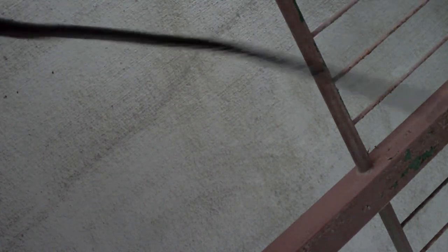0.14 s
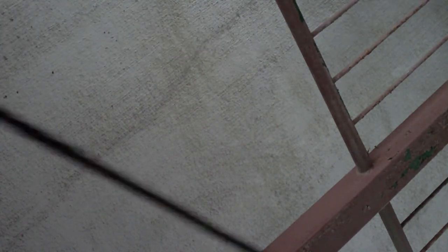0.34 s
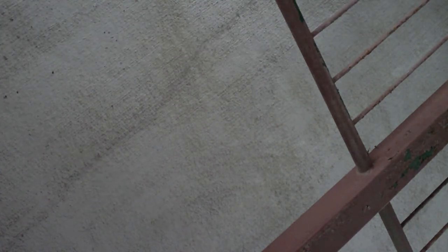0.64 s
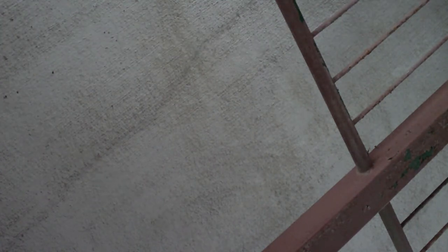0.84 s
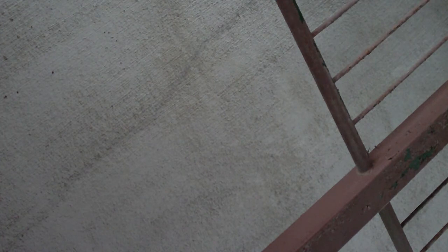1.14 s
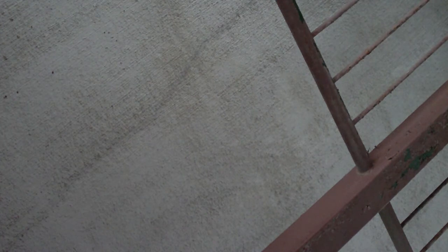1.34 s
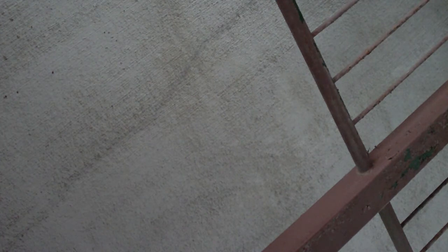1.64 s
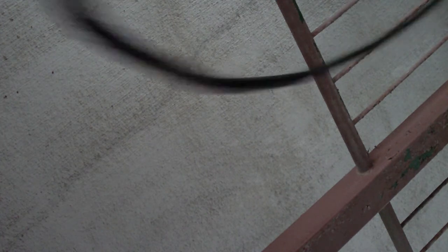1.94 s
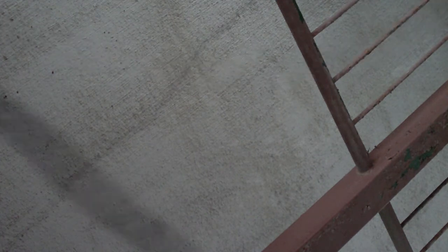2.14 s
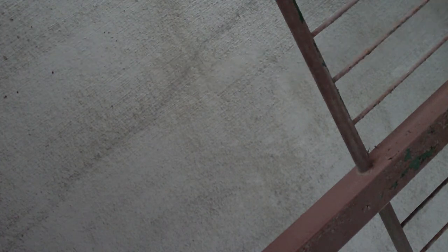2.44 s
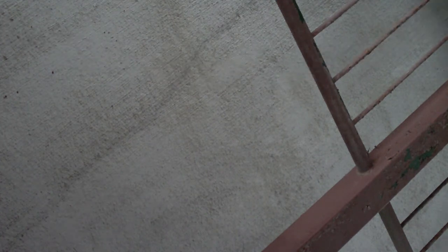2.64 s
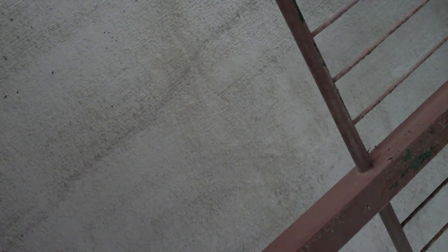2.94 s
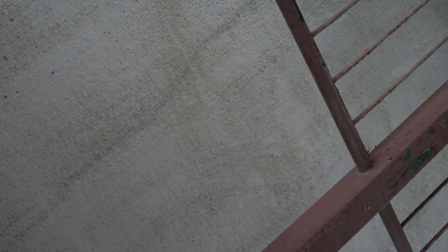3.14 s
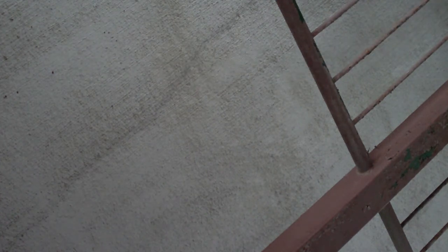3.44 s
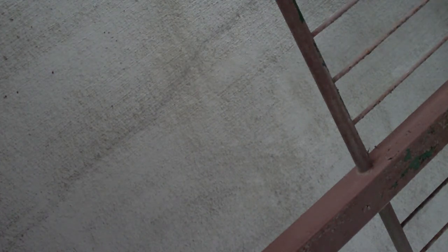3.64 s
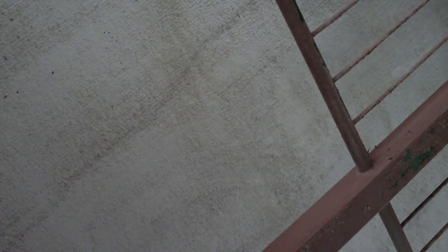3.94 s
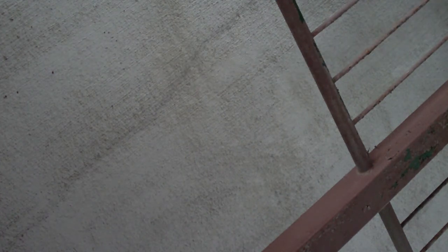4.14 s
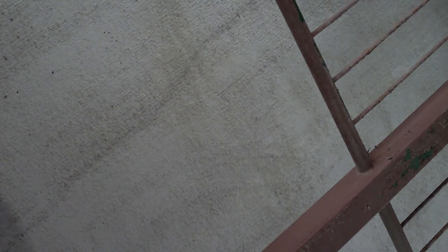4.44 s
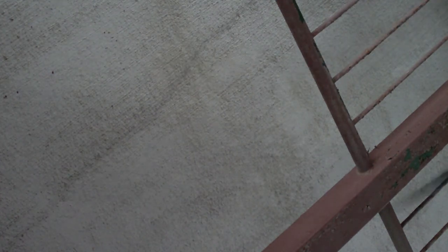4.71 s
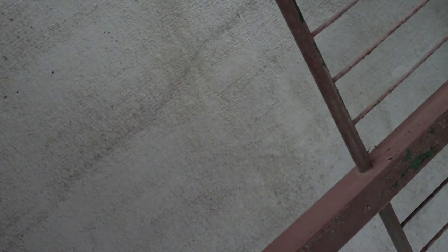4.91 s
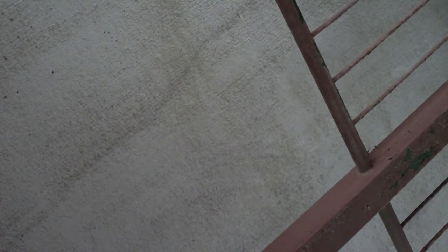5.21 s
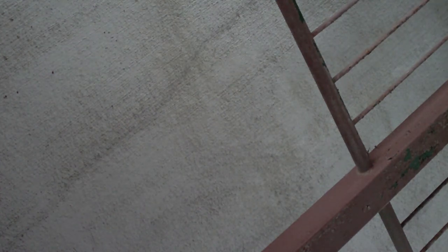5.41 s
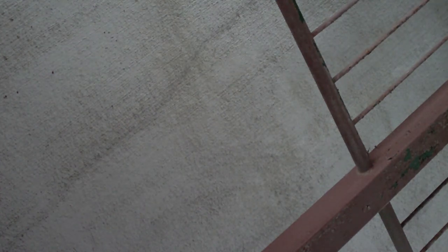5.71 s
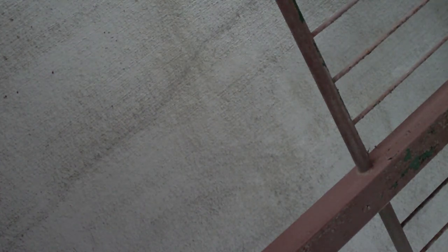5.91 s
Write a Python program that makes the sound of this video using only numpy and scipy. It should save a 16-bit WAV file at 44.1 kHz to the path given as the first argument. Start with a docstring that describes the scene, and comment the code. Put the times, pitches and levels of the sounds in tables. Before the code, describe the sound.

In a draughty, hard-walled hall with low rumble and steady soft hiss, a leather whip cracks three times at roughly two-second intervals. A very brief swish leads into each explosive, fizzy snap, and the walls throw back quick scatter and a short ring. Between cracks the lash ticks and slaps faintly on the floor. Draught bumps the microphone softly; the extreme top is dulled.

```python
"""A draughty, hard-walled hall with a low rumble and a steady hiss, where a leather bullwhip is cracked three times.
Each throw swishes and rushes as filtered noise, with faint narrow-band whistles around the later two.
At each crack the tip sheds an N-shaped shock wave, a low push and a burst of fizz; the walls throw them back.
After the cracks and between them the lash slaps and ticks on the floor, as short shaped puffs of noise.
The draught brushes the microphone in brief pressure dips; the microphone dulls the top."""
import sys
import numpy as np
from scipy import signal
from scipy.fft import rfft, irfft
from scipy.io import wavfile
from scipy.ndimage import uniform_filter1d

SR = 44100
rng = np.random.default_rng(int(sys.argv[2]) if len(sys.argv) > 2 else 0)


def wrap_up_sound(samples):
    """Save the sound to the file named by the first command line argument, as 16-bit audio."""
    columns = np.atleast_2d(samples).T
    # keep every value between -1 and 1, then stretch to whole-number steps
    tamed = np.clip(columns, -1, 1)
    steps = np.round(tamed * 32767).astype(np.int16)
    wavfile.write(sys.argv[1], SR, steps)


N = 267669  # samples

# The three cracks. Each row: time in seconds, shock peak in dB, shock length in seconds,
# shock's room level in dB relative to the shock, fizz energy in dB, fizz lead in seconds, fizz swell time
# in seconds, fizz tilt in dB per octave, fizz's room level in dB relative to the fizz, push in dB, rush in dB.
CRACKS = [(0.675, -14, 0.00071, -0.5, 0, -.0002, 0.0017, -1.1, 0, -28, -28.5),
          (2.7018, -12.5, 0.000583, -8, -0.6, .0025, 0.0021, 0.1, -3, -25.5, -32.5),
          (4.7601, -6.5, 0.000706, -3, -2.1, .0002, 0.00099, 0, -4, -21, -42)]


def gain_of(db):
    """Amplitude factor for a level in dB."""
    return 10 ** (np.asarray(db) / 20)


def evened(x):
    """The signal scaled to an RMS of 1."""
    return x / np.sqrt(np.mean(x ** 2) + 1e-20)


def bell(t, half):
    """A smooth rise and fall of height 1 around t = 0."""
    return np.exp(-.5 * (t / half) ** 2)


def read(points, hz, column=1):
    """One column of a table, joined by straight lines over log frequency."""
    columns = np.transpose(points)
    return np.interp(np.log(hz + 1), np.log(columns[0] + 1), columns[column])


def add(mix, s, sound):
    """Lay a sound into the mix from s seconds on, cut where the mix ends."""
    start = max(round(s * SR), 0)
    part = mix[start:][:len(sound)]
    part += sound[:len(part)]


def coloured(x, db_at, size=2048):
    """Causal minimum-phase filter whose gain in dB is db_at(Hz), with a floor of -80 dB."""
    hz = np.fft.rfftfreq(size, 1 / SR)
    half = np.log(gain_of(np.maximum(db_at(hz), -80)))
    log_gain = np.concatenate([half, half[-2:0:-1]])
    spectrum = np.exp(np.conj(signal.hilbert(log_gain)))  # the Hilbert transform gives the phase
    return signal.fftconvolve(x, np.fft.ifft(spectrum).real)


def burst(swell_s, db_at, size=2048):
    """A short puff of noise of energy 1 that swells and dies, with its spectrum shaped by db_at(Hz)."""
    u = np.arange(size) / SR / max(swell_s, 1 / SR)
    puff = rng.standard_normal(size) * u * np.exp(-u)
    z = rfft(puff)
    local_power = uniform_filter1d(abs(z) ** 2, size=5)
    flat = irfft(z / np.sqrt(local_power + 1e-20))[:size // 2]  # even spectrum before colouring
    puff = coloured(flat, db_at)
    return puff / np.linalg.norm(puff)


def hall(x, build_up_s=0.0034, clump_db=2.0):
    """Quick scatter and late ring of the hard walls; each call draws another tail, as for another place."""
    # Each row: frequency in Hz, early scatter in dB, its 60 dB decay time in seconds,
    # late ring in dB, its 60 dB decay time in seconds.
    decays = [(120, -10.5, 0.066, -22.5, 0.98), (338, -4.5, 0.047, -28, 0.85),
              (710, -19, 0.17, -30.5, 0.54), (1000, -18.5, 0.22, -33.5, 0.79),
              (1930, -13.5, 0.23, -29.5, 0.58), (2350, -18.5, 0.24, -28, 0.58),
              (3370, -15.5, 0.25, -27, 0.6), (4900, -19.5, 0.31, -25.5, 0.55),
              (6700, -14.5, 0.27, -31.5, 0.7), (9700, -19.5, 0.27, -26.5, 0.46),
              (15000, -21.5, 0.22, -26, 0.34)]
    clumps = evened(uniform_filter1d(rng.standard_normal(SR), size=130))  # reflections arrive in clumps
    taps = evened(rng.choice([-1., 1.], SR) * gain_of(clump_db * clumps))
    hz, t, z = signal.stft(taps, SR, nperseg=256)
    early_db = read(decays, hz, 1)[:, None] - 60 * t / read(decays, hz, 2)[:, None]
    late_db = read(decays, hz, 3)[:, None] - 60 * t / read(decays, hz, 4)[:, None]
    envelope = np.hypot(gain_of(early_db), gain_of(late_db))
    response = signal.istft(z * envelope, SR, nperseg=256)[1]
    age = np.arange(len(response)) / SR
    thickening = 1 - np.exp(-(age / build_up_s) ** 2)  # more walls answer
    return signal.fftconvolve(x, response * thickening)


def echoes(x, paths):
    """The direct sound and its slightly dulled returns from the nearest surfaces."""
    response = signal.unit_impulse(SR // 50)
    dulled = signal.lfilter([.7], [1, -.3], signal.unit_impulse(16))
    for delay_s, gain in paths:
        add(response, delay_s, gain * dulled)
    return signal.fftconvolve(x, response)


def air(level_db=-43.5, patchy_db=2.5, lumpy_below_hz=900, rumble_below_hz=200):
    """Steady hiss over a rumble that follows the draught's gusts and lulls and comes in small lumps."""
    # Background spectrum. Each row: frequency in Hz, relative density in dB per Hz.
    background = [(20, 3.5), (50, -2.5), (110, -5), (200, -9), (330, -12), (500, -17), (1000, -23.5),
                  (2000, -30.5), (4000, -37), (8000, -45), (11000, -48), (14000, -50.5)]
    # Gusts and lulls. Each row: middle in seconds, change of the rumble in dB, half length in seconds.
    gusts = [(1.155, 4.5, 0.052), (3.11, 3.5, 0.035), (3.793, -4, 0.26), (4.355, 4.5, 0.086),
             (4.598, -9, 0.022), (4.88, 4, .08)]
    hz, t, z = signal.stft(rng.standard_normal(N), SR, nperseg=1024, noverlap=768)
    patches = uniform_filter1d(rng.standard_normal(z.shape), size=10, axis=0)
    patches = evened(uniform_filter1d(patches, size=3, axis=1))
    lumps_db = patchy_db / (1 + (hz[:, None] / lumpy_below_hz) ** 2) * patches
    draught_db = sum(db * bell(t - s, half) for s, db, half in gusts)
    swell_db = draught_db / (1 + (hz[:, None] / rumble_below_hz) ** 4)
    z = z * gain_of(read(background, hz)[:, None] + lumps_db + swell_db)
    noise = signal.istft(z, SR, nperseg=1024, noverlap=768)[1][:N]
    high_pass = signal.butter(2, 18, "high", fs=SR, output="sos")
    return gain_of(level_db) * evened(signal.sosfilt(high_pass, noise))


def bumps(per_s=14, small_db=-38, small_half_s=0.0004):
    """Eddies brush the microphone: each is a brief dip in pressure, a few large and many small."""
    # The largest puffs. Each row: time in seconds, depth in dB ahead of the high-pass, half length in seconds.
    large = [(0.542, -36, 0.00088), (0.9666, -30.5, 0.0009), (1.075, -30, 0.0004), (1.209, -24, 0.00045),
             (1.802, -29, 0.00065), (2.017, -21, 0.00088), (2.0855, -26, 0.00076), (4.148, -27, 0.0023),
             (4.2826, -29, 0.00038), (5.095, -25, 0.0018)]
    out = np.zeros(N)
    t = np.arange(-SR // 50, SR // 50) / SR
    for s, db, half in large:
        add(out, s + t[0], -gain_of(db) / np.cosh(t / half))
    small = (rng.random(N) < per_s / SR) * rng.uniform(0.9, 2.1, N)  # random times and sizes
    out -= gain_of(small_db) * signal.fftconvolve(small, 1 / np.cosh(t / small_half_s), "same")
    return signal.sosfilt(signal.butter(1, 40, "high", fs=SR, output="sos"), out)


def slaps():
    """Leather lands on the floor: a dead puff with no ring of its own, answered by the hall."""
    # Each row: time in seconds, energy in dB, contact (swell) time in seconds, centre in Hz,
    # width in octaves to either side, room level in dB relative to the slap.
    landings = [(1.017, -38, 0.0016, 8200, .6, -11), (1.2808, -34, 0.00026, 4900, 0.6, -12),
                (1.2845, -25, 0.00061, 2780, 0.61, -15), (1.8055, -40, .001, 9000, 0.62, -9),
                (2.685, -25, 0.0021, 1700, 1.2, -9), (2.824, -16.5, 0.0015, 1820, 0.79, -11.5),
                (2.878, -16.5, 0.003, 680, 0.77, -7.5), (2.889, -15.5, 0.0033, 6550, 1.7, -8),
                (3.7848, -24.5, 0.00025, 7600, 0.44, -15), (3.788, -22, 0.00079, 7000, 3.5, -10),
                (3.834, -28, .002, 6500, 3, -8.5), (4.980, -21, 0.0018, 7000, 2.6, -10),
                (5.391, -31, .003, 7000, 3.2, -8.5), (5.430, -30.5, .002, 1500, 0.71, -13),
                (5.548, -37.5, .002, 8000, .8, -11)]
    direct, to_walls = np.zeros((2, N))
    for s, db, contact_s, centre_hz, octaves, room_db in landings:
        puff = burst(contact_s, lambda hz: -10 * np.log10(1 + (np.log2((hz + 1) / centre_hz) / octaves) ** 4))
        add(direct, s, gain_of(db) * puff)
        add(to_walls, s, gain_of(db + room_db) * puff)
    return direct + hall(to_walls)[:N]


def eddies(s, db, half_s, centre_hz, width_hz):
    """Air shed behind the moving thong: a band of noise that swells to its top at s; returns (start, sound)."""
    t = np.arange(SR // 2) / SR
    hz = np.fft.rfftfreq(len(t), 1 / SR)
    noise = rfft(rng.standard_normal(len(t)))
    band = evened(irfft(noise * bell(hz - centre_hz, width_hz / 2)))
    return s - t.mean(), gain_of(db) * band * bell(t - t.mean(), half_s)


def thong(room_db=-4.5):
    """The thong cuts the air: a wide swish and a rush lead into every crack; now and then a thin whistle."""
    # The thin end of the lash whistles. Each row: loudest moment in seconds, level in dB, pitch in Hz.
    whistles = [(2.612, -65.5, 9000), (3.130, -76, 9650), (4.683, -72.5, 9180), (4.690, -78, 6900)]
    out = np.zeros(N)
    for s, *_, rush_db in CRACKS:
        # the thong swishes as it unrolls, loudest just before the crack
        add(out, *eddies(s - 0.013, db=-64, half_s=0.037, centre_hz=6200, width_hz=19000))
        # then the loop runs out to the tip in a brief, lower rush
        add(out, *eddies(s - 0.001193, rush_db, half_s=.0009, centre_hz=1300, width_hz=6600))
    for s, db, pitch_hz in whistles:
        add(out, *eddies(s, db, half_s=0.016, centre_hz=pitch_hz, width_hz=120))
    return out + gain_of(room_db) * hall(out)[:N]


def shock(length_s):
    """An N-shaped pressure wave: jump up, ramp down, jump back over about three samples."""
    u = np.arange(SR // 100) / SR / length_s
    return (1 - 2 * u) * np.clip((1 - u) * length_s * SR / 3, 0, 1)


def push(t, hz=364):
    """The tip shoves the air aside: a low push of about one cycle around t = 0."""
    return np.sin(2 * np.pi * hz * t) * bell(t, .5 / hz)


def crack(row, paths, stretches=(.5, .75, 1.15), push_delay_s=.0015):
    """The supersonic tip sheds a shock wave and a low push while its frayed fibres tear the air."""
    s, shock_db, shock_s, shock_room_db, fizz_db, lead_s, fizz_s, tilt_db, fizz_room_db, push_db, _ = row
    out = np.zeros(N)
    add(out, s, gain_of(shock_db) * echoes(shock(shock_s), paths))
    room_gain = gain_of(shock_db + shock_room_db) / np.sqrt(sum(stretches))
    for stretch in stretches:  # the wave leaves with another length in each direction
        add(out, s, room_gain * hall(shock(shock_s * stretch)))
    t = np.arange(-SR // 200, SR // 200) / SR
    add(out, s + push_delay_s + t[0], gain_of(push_db) * push(t))

    def fizz_colour(hz):
        """Tilted spectrum in dB, with the lows rolled off below 900 Hz."""
        return tilt_db * np.log2((hz + 200) / 4000) - 10 * np.log10(1 + (900 / (hz + 1)) ** 2)

    fizz = burst(fizz_s, fizz_colour)
    add(out, s - lead_s, gain_of(fizz_db) * echoes(fizz, paths))
    add(out, s - lead_s, gain_of(fizz_db + fizz_room_db) * hall(fizz))
    return out


def scene():
    """The whip over the draught and the steady hiss."""
    # The tip cracks at a new place each time, so each crack has its own near echoes.
    # Each row: one crack's four echoes, each a delay in seconds and a gain (ahead of the dulling).
    near_paths = [
        [(.00122, 0.99), (.00333, 0.54), (.00636, 0.71), (.0100, 0.15)],
        [(.00104, 1), (.00187, 0.66), (.0030, 0.53), (.00687, 0.13)],
        [(.00195, 1.06), (.0031, 0.37), (.0079, 0.34), (.0122, 0.1)],
    ]
    cracks = sum(crack(row, paths) for row, paths in zip(CRACKS, near_paths))
    return (cracks + slaps() + thong() + bumps() + air())[None]


def record(dry):
    """The microphone dulls the top; a narrow notch, then the band limit."""
    # Microphone colour. Each row: frequency in Hz, gain in dB.
    microphone = [(20, -1), (6000, 0.5), (10500, 1.5), (12000, -4), (13500, -11.5), (15200, -18)]
    notch_hz, edge_hz = 7900, 15400
    x = coloured(dry[0], lambda hz: read(microphone, hz))[:N]
    notch = signal.butter(2, [notch_hz - 150, notch_hz + 150], "bandstop", fs=SR, output="sos")
    low_pass = signal.firwin(511, edge_hz, window=("kaiser", 9), fs=SR)
    return signal.oaconvolve(signal.sosfilt(notch, x), low_pass, "same")[None]


dry = scene()
out = record(dry)
wrap_up_sound(out)
```